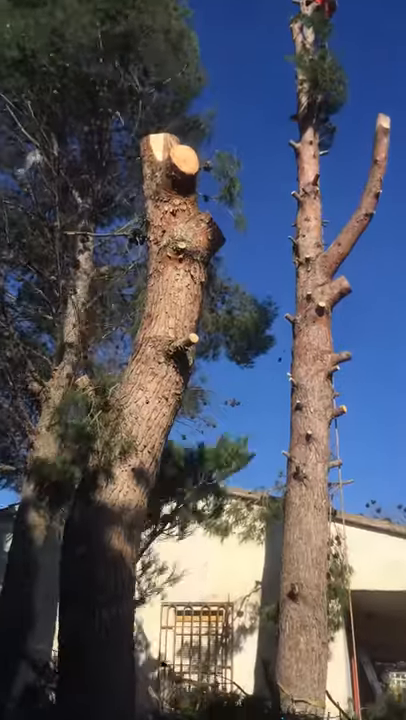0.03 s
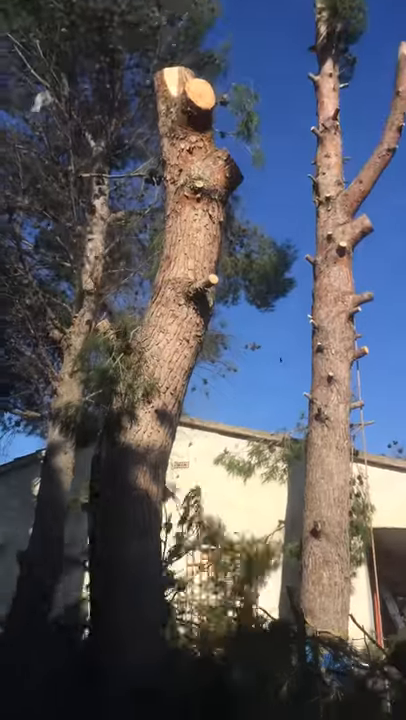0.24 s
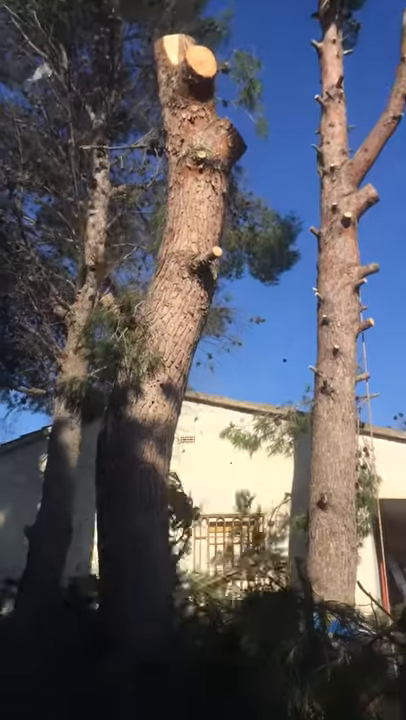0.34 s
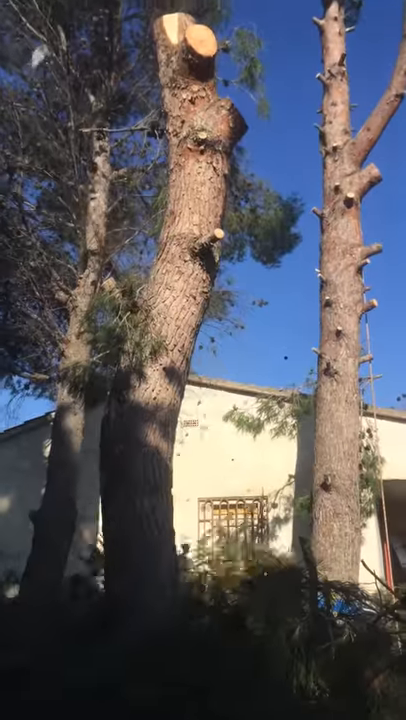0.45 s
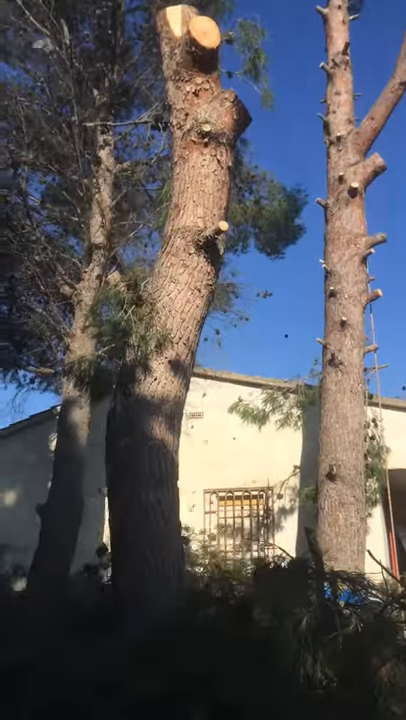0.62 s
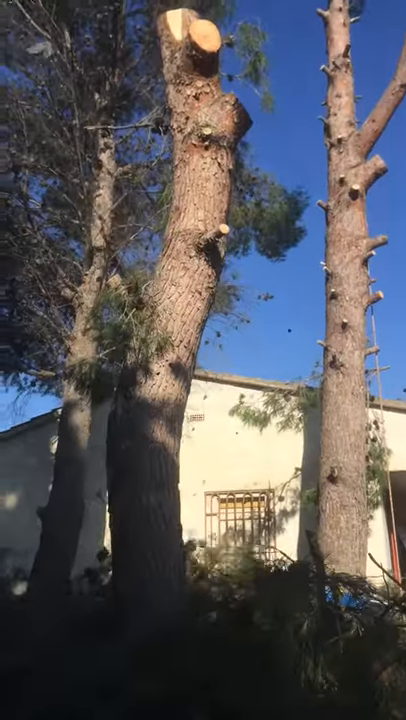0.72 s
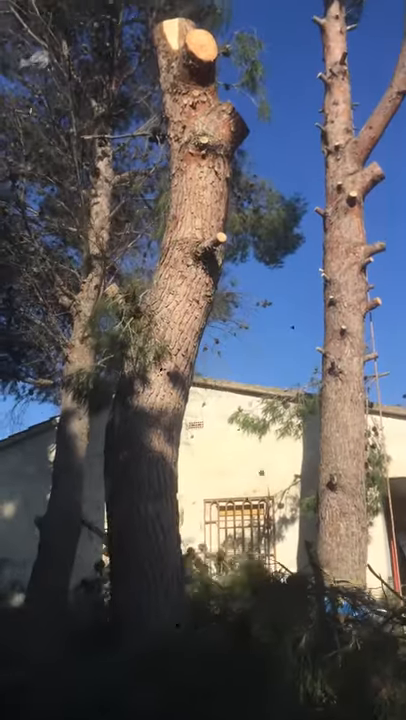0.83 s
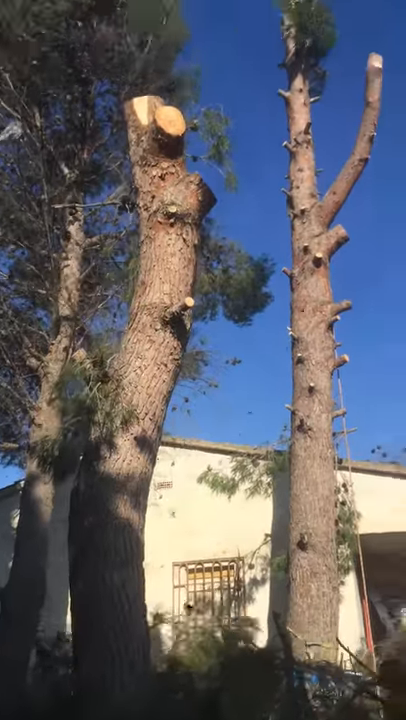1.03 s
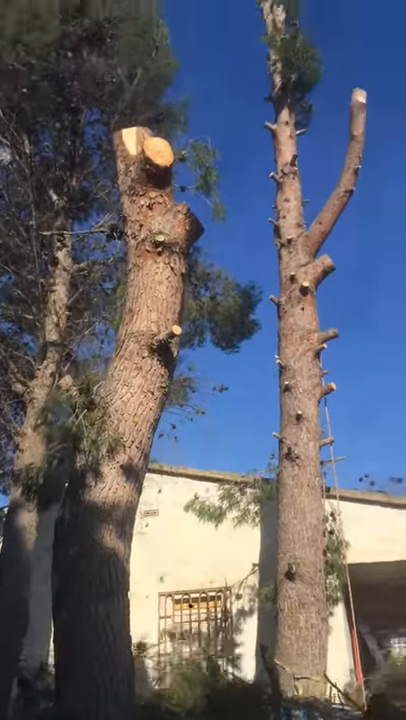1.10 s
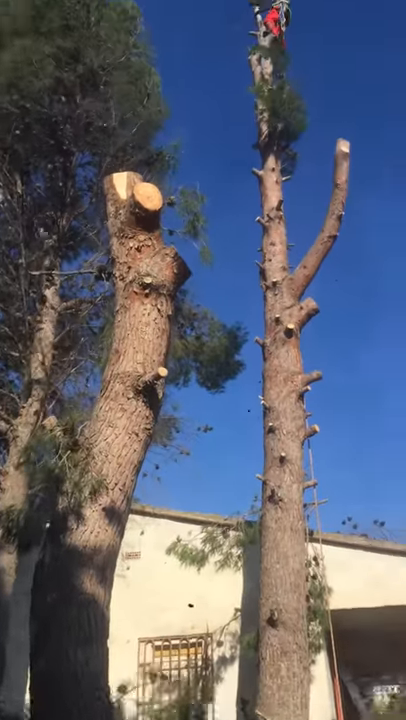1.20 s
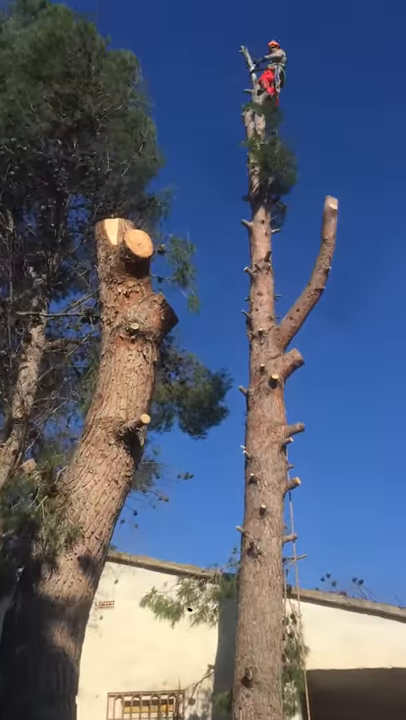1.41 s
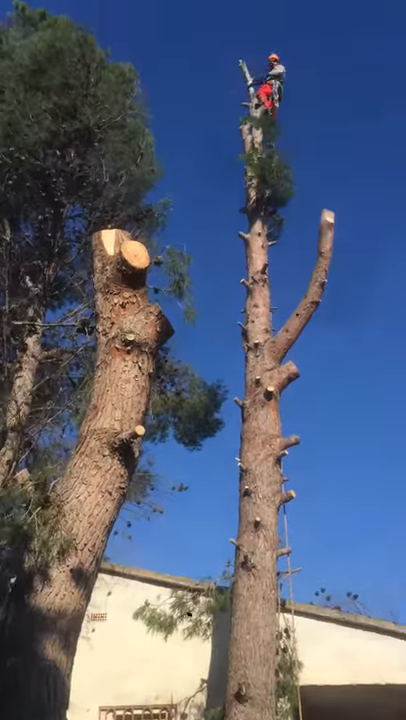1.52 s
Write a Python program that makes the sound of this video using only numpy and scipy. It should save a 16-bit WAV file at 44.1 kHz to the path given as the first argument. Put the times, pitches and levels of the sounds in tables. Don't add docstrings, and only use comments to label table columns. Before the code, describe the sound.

Falling treetop lands with a crackling rush and low thump, rustle fading over a sputtering two-stroke saw

```python
import sys
import numpy as np
from scipy import signal
from scipy.fft import rfft, irfft, next_fast_len
from scipy.io import wavfile
from scipy.ndimage import uniform_filter1d, map_coordinates

SR = 44100
rng = np.random.default_rng(int(sys.argv[2]) if len(sys.argv) > 2 else 0)


def to_linear_factor(level_db):
    exponent = np.asarray(level_db, float) / 20
    return 10 ** exponent


def file_out(sig):
    cols = np.atleast_2d(sig).T
    lim = np.clip(cols, -1, 1)
    pcm = np.round(lim * 32767).astype(np.int16)
    wavfile.write(sys.argv[1], SR, pcm)


N = 68355


def foliage():
    # (time [s], level [dB])
    stirring = [(0, -33.5), (.06, -36.5), (0.196, -38), (0.196, -27), (0.261, -24), (.33, -27),
                (0.419, -36.5), (0.601, -38), (0.648, -33), (.72, -40.5), (.78, -42), (.925, -46),
                (.945, -48), (0.999, -47.5), (1.198, -49), (1.34, -59), (1.379, -45), (1.45, -46.5),
                (1.55, -51.5)]
    # (frequency [Hz], level per Hz [dB])
    needle_colour = [(530, -1), (900, -4), (2050, -7.5), (2220, -4), (2390, -2), (6270, -1.5),
                     (12200, -3.5), (15500, -4.5)]
    # (frequency [Hz], level per Hz [dB])
    limb_colour = [(300, -30), (600, -7), (1500, 6), (3000, -11), (6000, -28)]
    # (frequency [Hz], level per Hz [dB])
    tip_colour = [(6000, -33), (10000, 3), (13500, 0), (15500, -18)]
    ticks_per_s, flutters_per_s = 2500, 45
    hardest_db = -23.5

    draw = rng.random((int(ticks_per_s * N / SR), 3))
    tick_hz = np.clip(6050 * np.exp(2.48 * (draw[:, 1:2] - 0.5)), 500, 15000)
    size = to_linear_factor(-3.5 * np.log(draw[:, 2:] + 0.0034))
    t = np.arange(120) / SR
    tick = np.sin(2 * np.pi * tick_hz * t) * np.exp(-t * tick_hz / 1.28)
    ticks = unit(laid(draw[:, 0] * N / SR, size * tick))

    s, db = np.transpose(stirring)
    flutter = map_coordinates(rng.standard_normal(200), [np.arange(N) * flutters_per_s / SR])
    stir_db = np.interp(np.arange(N) / SR, s, db) + 1 * flutter

    below_hardest = stir_db - hardest_db
    limbs = to_linear_factor(-11.5 + 0.61 * below_hardest) * patchy(limb_colour, patchy_db=3.5)
    tips = to_linear_factor(-11.5 + 0.62 * below_hardest) * patchy(tip_colour, patchy_db=4.0)
    needles = patchy(needle_colour, patchy_db=2.0)
    return to_linear_factor(stir_db) * (limbs + tips + needles + to_linear_factor(-6) * ticks)


def snaps():
    # (time [s], peak level [dB], ring pitch [Hz], time to fall 60 dB [s], ring share [0-1])
    twigs = [(.0425, -19, 2450, .02, .3), (.1612, -13, 4900, .008, .1), (.1957, -17, 2400, .02, .05),
             (.2056, -7, 5000, .012, .15), (.2447, -12, 6350, .025, .15), (.2575, -13, 4900, .025, .15),
             (.2915, -13, 5800, .02, .05), (.3217, -4, 10000, .008, .05), (.3245, -13, 3900, .03, .2),
             (.38, -17, 9000, .01, .1), (.4525, -12, 11300, .015, .15), (.4584, -3, 6150, .02, .25),
             (.5082, -21, 6900, .012, .1), (.538, -22, 4750, .02, .2), (.6343, -8, 4860, .007, .1),
             (.652, -17, 3250, .015, .25), (.655, -22, 12000, .016, .05), (.7055, -22, 11500, .02, .1),
             (.939, -21, 11700, .02, .15), (1.2885, -33, 5100, .015, .3), (1.361, -30, 8300, .02, .03),
             (1.3698, -28, 6000, .016, .08), (1.4438, -15, 4300, .018, .3), (1.515, -28, 4150, .025, .2)]
    rise_s, lag_s = 0.00046, 0.0008
    t = np.arange(2500) / SR
    shapes = []
    for _, db, hz, t60, share in twigs:
        edge_hz = min(0.7 * hz, 4360)

        def band(f):
            low_cut = (f * f / (f * f - edge_hz * edge_hz - 1.2j * f * edge_hz)) ** 2
            return low_cut / (1 + 1j * f / (1.36 * hz)) ** 2

        burst = unit(filtered(rng.standard_normal(len(t)), band))
        wobble = 0.052 * np.cumsum(rng.standard_normal(len(t)))
        ring = np.sin(2 * np.pi * hz * t + wobble)
        fade = to_linear_factor(db - 3 - 60 * t / t60) * (1 - np.exp(-t / rise_s))
        shapes.append(fade * ((1 - share) * burst + 2 * share * ring))
    return laid([twig[0] + lag_s for twig in twigs], np.array(shapes))


def thump():
    # (time [s], level [dB])
    blows = [
        (0.2218, -34),
        (0.2648, -7),
        (0.326, -23),
    ]
    # (frequency [Hz], level [dB], time to fall 60 dB [s])
    stem_modes = [(61.3, -4, 0.23), (112.4, -8.5, 0.21), (149.4, 3, 0.044), (193.7, 3.5, 0.073),
                  (282, -11, .1), (387.4, -21.5, 0.18), (860, -6, 0.021)]
    rise_s = 0.0022
    t = np.arange(SR // 2) / SR
    s, level_db = np.transpose(blows)
    ring = sum(to_linear_factor(db - 60 * t / t60) * np.sin(2 * np.pi * hz * t) for hz, db, t60 in stem_modes)
    return laid(s, to_linear_factor(level_db)[:, None] * ring * (1 - np.exp(-t / rise_s)))


def saw():
    # (time [s], peak
    # level [dB])
    firings = [(0.0251, -21), (0.0916, -26.5), (0.1367, -18.5), (0.2006, -28.5), (0.2246, -21),
               (0.3778, -26.5), (0.4619, -20.5), (0.5269, -27), (0.5491, -20.5), (0.6472, -20.5),
               (0.69, -25.5), (0.7308, -21.5), (0.7941, -19.5), (0.8591, -19), (0.9245, -20), (1.0135, -20),
               (1.0765, -27.5), (1.0992, -26.0), (1.1406, -20), (1.2058, -18), (1.2698, -22), (1.3141, -25),
               (1.3814, -17.5), (1.4685, -18), (1.5485, -26.5)]
    # (frequency [Hz], width [Hz], level [dB])
    casing = [(80.5, 8.4, 13), (139, 31, 2), (182, 17, 2), (361.5, 11.7, 2), (475, 19.6, -10.5)]
    turn_s, jitter_s = 0.0216, 0.00063
    lead_s = 0.004
    s, db = np.transpose(firings)
    t = np.arange(700) / SR - lead_s

    def puff(hz, life_s):
        return -np.exp(-np.abs(t) / life_s) * np.cos(2 * np.pi * hz * t)

    def hiss_band(hz):
        return 1j * hz / (500 + 1j * hz) / (1 + 1j * hz / 2780) ** 2

    def body(f):
        return 1 + sum(to_linear_factor(g) * 1j * f * w / (c * c - f * f + 1j * f * w) for c, w, g in casing)

    hiss = rng.standard_normal((len(s), len(t))) * to_linear_factor(-60 * t / 0.024) * (t > 0)
    blast = filtered(laid(s - lead_s, to_linear_factor(db + 0.5)[:, None] * hiss), hiss_band)

    turns = [[s[0] - turn_s]]
    for a, b in zip(s, s[1:]):
        turns.append(np.linspace(a, b, round((b - a) / turn_s) + 1)[1:-1])
    turns = np.concatenate(turns)
    turns = turns + jitter_s * rng.standard_normal(len(turns))
    idle_db = -33.5 + 4 * rng.standard_normal((len(turns), 1))

    fired = laid(s - lead_s, to_linear_factor(db + 1.5)[:, None] * puff(hz=500, life_s=0.0005))
    idle = laid(turns - lead_s, to_linear_factor(idle_db) * puff(hz=330, life_s=0.0008))
    return filtered(fired + idle, body) + blast


def walls(x):
    # (delay [s], level [dB], top frequency [Hz])
    echoes = [(.0066, -5, 450), (.0298, -6, 4000), (.0328, -13, 600), (.0386, -15, 500), (.0432, -15, 600),
              (.0492, -12, 500)]

    def answers(f):
        return sum(to_linear_factor(db) * np.exp(-2j * np.pi * f * s) / (1 + (f / hz) ** 2) for s, db, hz in echoes)

    return filtered(x, answers)


def yard(x):
    # (frequency [Hz], time to fall 60 dB [s])
    tail_times = [(100, 0.58), (1000, 0.82), (8000, 0.33)]
    hz, t, z = signal.stft(rng.standard_normal(SR // 2), SR, nperseg=256)
    fade = to_linear_factor(-60 * t / along(tail_times, hz)[:, None])
    tail = signal.istft(z * fade, SR, nperseg=256)[1]
    late = np.pad(x, (400, 0))
    return signal.fftconvolve(late, tail / np.linalg.norm(tail))[:N]


def hum():
    t = np.arange(N) / SR
    hz = 76 * (1 + 0.059 * map_coordinates(rng.standard_normal(40), [t * 12]))
    swell_db = 8 * np.clip(t - 0.4, 0, 0.45) / 0.45
    return to_linear_factor(-55 + 3 + swell_db) * np.sin(2 * np.pi * np.cumsum(hz) / SR)


def open_air():
    # (frequency [Hz], level per Hz [dB])
    air_colour = [(18, -36), (30, 13), (133, 3.5), (350, -1.5), (1050, -14), (1440, -5), (3230, -21),
                  (12600, -35), (15500, -40)]
    return to_linear_factor(-42.5) * patchy(air_colour, patchy_db=2.0)


def unit(x):
    return x / np.sqrt(np.mean(x ** 2) + 1e-20)


def along(points, hz):
    f, v = np.transpose(points)
    return np.interp(np.log(hz + 1), np.log(f + 1), v)


def filtered(x, response):
    m = next_fast_len(len(x) + 8192)
    return irfft(rfft(x, m) * response(np.fft.rfftfreq(m, 1 / SR)), m)[:len(x)]


def patchy(spectrum, patchy_db):
    z = signal.stft(rng.standard_normal(N + 512), nperseg=256)[2]
    field = uniform_filter1d(rng.standard_normal(z.shape), 8, 0)
    field = unit(uniform_filter1d(field, 6, 1))
    x = signal.istft(z * to_linear_factor(patchy_db * field), nperseg=256)[1][:N]
    return unit(filtered(x, lambda hz: to_linear_factor(along(spectrum, hz))))


def laid(times, shapes):
    starts = np.round(np.asarray(times) * SR).astype(int)
    at = starts[:, None] + np.arange(shapes.shape[1])
    return np.bincount(np.clip(at, 0, N).ravel(), shapes.ravel(), N + 1)[:N]


def scene():
    engine, twigs, blow = saw(), snaps(), thump()
    tail = yard(to_linear_factor(-5.5) * engine + to_linear_factor(-14.5) * twigs + to_linear_factor(-20) * blow)
    near = foliage() + twigs + blow + engine
    return (near + walls(engine) + tail + hum() + open_air())[None]


def low_pass(x):
    return signal.sosfilt(signal.butter(12, 16350, fs=SR, output="sos"), x)


def record(dry):
    low_hz, top_hz = 48, 15500

    def passband(hz):
        bass = (hz / low_hz) ** 6
        return (hz < top_hz) * bass / (1 + bass)

    x = filtered(dry[0], passband)
    return low_pass(x[None])


dry = scene()
out = record(dry)
file_out(out)
```